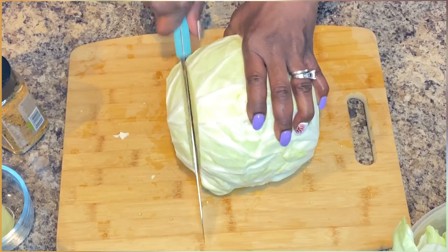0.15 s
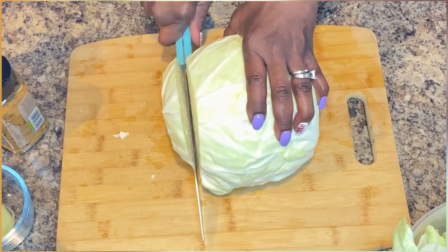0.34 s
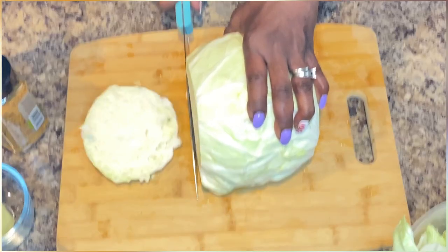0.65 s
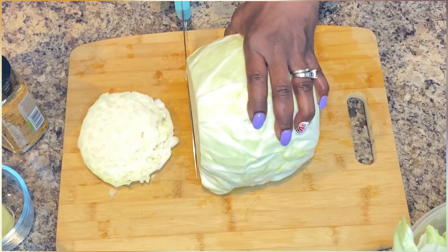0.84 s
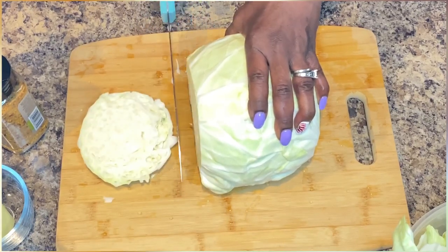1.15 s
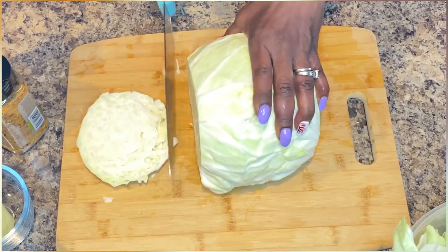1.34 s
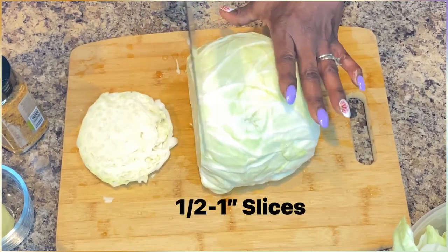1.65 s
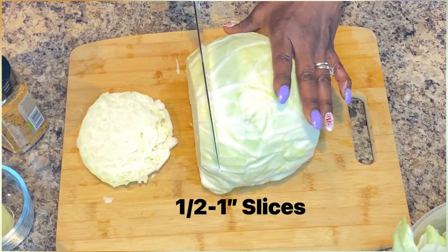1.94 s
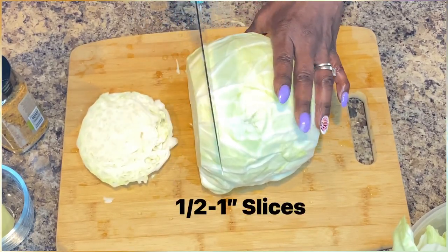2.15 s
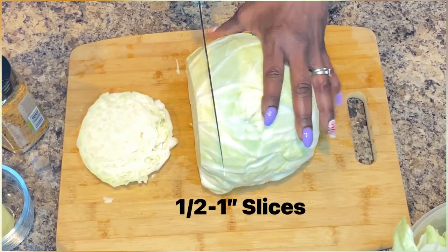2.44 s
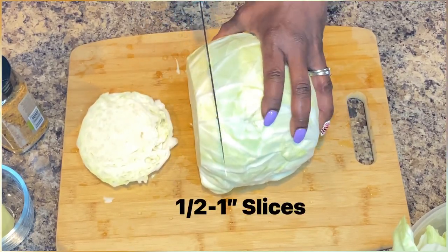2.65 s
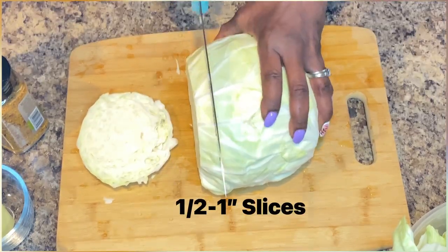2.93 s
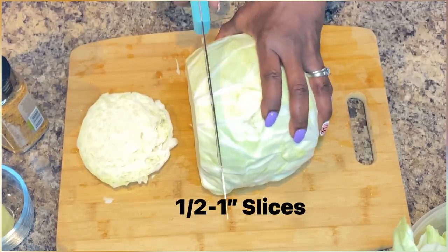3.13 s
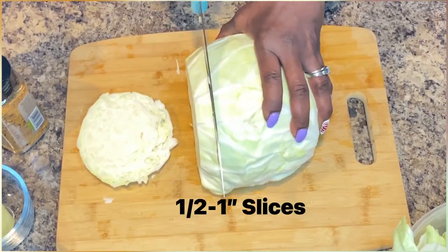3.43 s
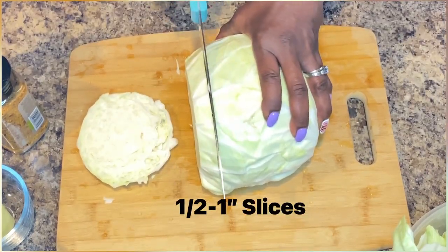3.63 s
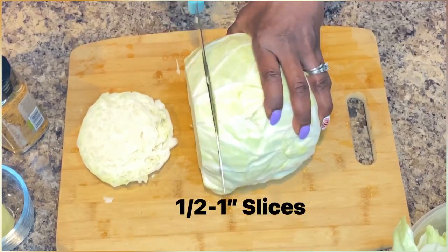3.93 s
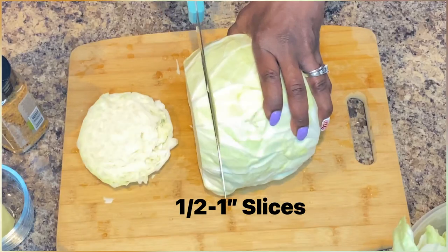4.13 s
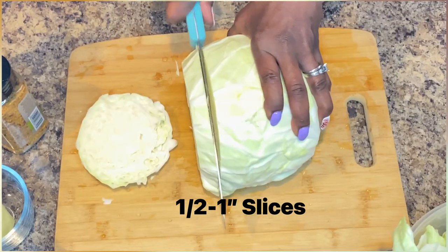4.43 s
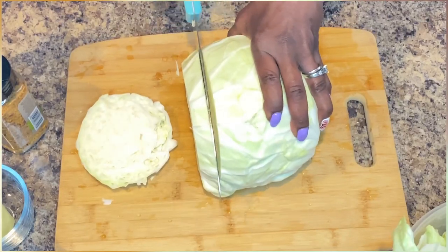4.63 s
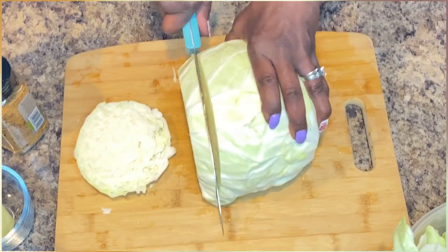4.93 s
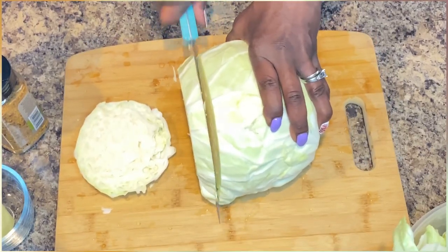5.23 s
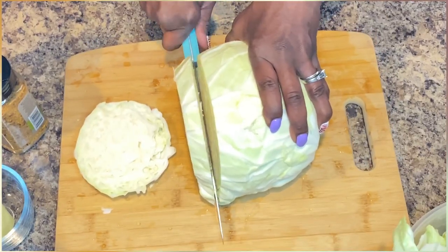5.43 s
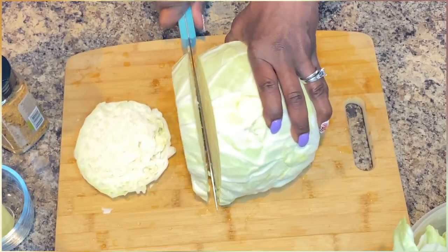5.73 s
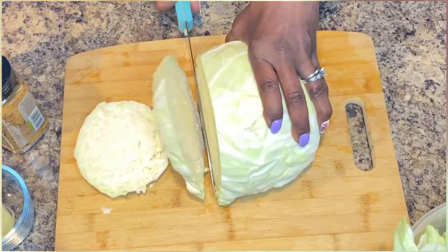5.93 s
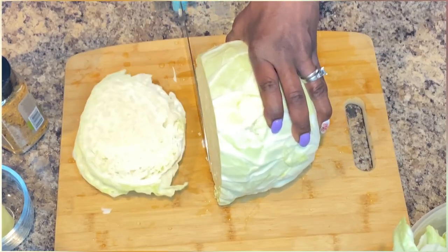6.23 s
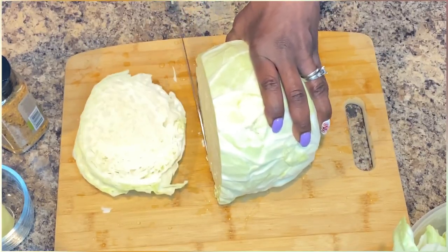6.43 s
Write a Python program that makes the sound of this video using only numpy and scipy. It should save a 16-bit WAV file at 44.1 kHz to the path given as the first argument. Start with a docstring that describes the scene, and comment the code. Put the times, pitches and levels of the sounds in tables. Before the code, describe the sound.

A knife crunches through a raw cabbage on a wooden board, with sharp wooden knocks and two wet slices flopping down in a quiet kitchen.

```python
"""A kitchen knife saws through a raw cabbage on a wooden board, close to the microphones, in a small kitchen.
Each push is a crunch: thousands of random clicks stand for bursting leaf cells, with a few ribs snapping.
Knocks on the board are short fading tones; drags of the blade are hiss with drifting tones.
Two slices topple over: noise that swells and dies makes the wet slap, deep fading tones the soft thud.
Behind it all, filtered noise makes a quiet room rumble with a low hum that swells once."""
import sys
import numpy as np
from scipy import signal
from scipy.fft import rfft, irfft
from scipy.io import wavfile
from scipy.ndimage import uniform_filter1d

SR = 44100
rng = np.random.default_rng(int(sys.argv[2]) if len(sys.argv) > 2 else 0)


def put_to_file(sound):
    """Save the sound as 16-bit audio at rate SR, in the file named by the first command-line argument."""
    columns = np.atleast_2d(sound).T  # one column per channel
    safe = np.clip(columns, -1, 1)
    whole_steps = np.round(safe * 32767)
    wavfile.write(sys.argv[1], SR, whole_steps.astype(np.int16))


N = 289737
TIME = np.arange(N) / SR

# sound colour of the room rumble: (frequency [Hz], level [dB per Hz])
AIR_COLOUR = [(22, -26), (40, -7), (65, 1), (110, -6), (170, -15), (280, -19), (500, -27), (850, -30),
              (1300, -36), (2200, -51.5), (4000, -62), (10000, -60.5), (16000, -67)]
AIR_DB, HUM_DB = -51, -61.5  # the hum level holds outside its swell
# the low hum swells once: (time of the top [s], half width [s], rise [dB])
HUM_SWELL = (5.68, 0.49, 12.2)

# how long the kitchen rings on: (frequency [Hz], time to fall by 60 dB [s])
ROOM_DECAY = [(150, 0.6), (600, 0.25), (1500, 0.17), (12000, 0.14)]
FIRST_ECHO_S = 0.0035  # the diffuse tail starts to build after this time
# near echoes off the kitchen surfaces: (delay [s], gain [factor])
NEAR_ECHOES = [(.0043, 0.25), (.0092, 0.16)]
# phase by which the left microphone leads the right: (frequency [Hz], phase [radians])
MIC_PHASE = [(300, 0), (700, -.33), (1100, 0), (1650, 0), (2500, 1.15), (3500, .3), (4200, .65),
             (4700, 1.7), (5250, 6.2), (7000, 7.4), (10000, 8.3), (12500, 9.42)]
EDGE_HZ = 15800  # almost nothing is heard above this

# cabbage toppling, rocking and bumping on the board: (time [s], peak level [dB], pitch [factor])
FLOPS = [(.627, -28.5, 1.34), (.639, -25.5, 0.9), (.684, -37, 1.18), (0.709, -39, 0.91),
         (6.135, -29, 0.974), (6.188, -37, 0.98), (6.207, -40.5, 0.96)]
# tones of cabbage and board thudding together, before the pitch factor:
# (frequency [Hz], relative level [dB], time to fall by 60 dB [s])
THUD_TONES = [(52.7, -2, 0.25), (99, 1, 0.12), (145.5, -5.5, 0.13), (213, 0, 0.094), (296, -6, 0.05)]

# the wet face of a slice slapping down:
# (time of full contact [s], peak level [dB], time to close [s], time to die away [s])
SLAPS = [(0.6226, -22.5, 0.0099, 0.032), (6.127, -26, 0.048, 0.031)]
# sound colour of a slap: (frequency [Hz], level [dB per Hz])
SLAP_COLOUR = [(200, -11), (900, -3.5), (2500, -3), (4600, -11.5), (5600, -9.5), (15000, -32.5)]

# the flat of the blade gliding up the cut face: (start [s], length [s], level [dB])
GLIDE = (1.48, 0.2, -80)
# resonances during the glide: (frequency [Hz], width [Hz], relative level [dB])
GLIDE_TONES = [(2020, 350, -1), (4100, 650, 0)]

# the blade dragged over the board: (start [s], length [s], level at the start [dB])
DRAGS = [(0.13, 0.1, -53.5), (0.331, 0.28, -51.5), (0.627, 0.26, -55), (0.985, 0.094, -49),
         (1.212, 0.075, -60), (5.237, 0.048, -46), (5.32, 0.064, -51), (5.518, 0.14, -52.5),
         (5.695, 0.097, -58.5), (5.81, 0.31, -58.5), (6.148, 0.16, -57.5), (6.338, 0.33, -63)]
# resonances of blade and board under a drag: (frequency [Hz], width [Hz], relative level [dB])
DRAG_TONES = [(919, 220, -1), (2134, 480, 0), (3020, 220, -8)]
# sound colour of the hiss of the dragged blade: (frequency [Hz], level [dB per Hz])
DRAG_COLOUR = [(300, -14), (1400, -10), (4000, -16), (6300, -25), (15000, -31.5)]
# each drag leans in, eases off and lifts
DRAG_ATTACK_S, DRAG_RELEASE_S, DRAG_SAG_DB_PER_S = 0.015, 0.049, 9

# knocks on the board, by the blade or by the rocking cabbage: (time [s], peak level of the wood [dB],
# hardness of the contact [Hz], pitch of the spot struck [factor], ringing relative to the wood [dB])
KNOCKS = [(0.1092, -13.5, 2390, 1.09, -26.5), (0.1103, -18, 2150, 1.8, -38), (0.1124, -26.5, 900, .62, -45),
          (.3475, -33, 1790, 0.8, -37), (0.9807, -18.5, 2470, 1.05, -26), (0.9872, -14.5, 1350, 1.04, -32),
          (.989, -28, 706, 0.513, -45), (1.0491, -21, 1290, 1, -31), (1.067, -24.5, 1300, 0.95, -47.5),
          (1.0908, -27, 1650, 0.94, -43), (1.184, -10.5, 1750, 1.06, -48), (1.272, -32, 1310, 0.96, -36),
          (2.0392, -48.5, 2200, 1.24, -30), (2.4479, -32, 1840, 1.27, -36.5), (2.731, -23, 1660, 1.34, -38),
          (3.7035, -33.5, 755, 0.86, -50), (3.709, -34, 603, 0.42, -49), (5.2268, -4, 2630, 0.99, -12.5),
          (5.2283, -15.5, 970, 0.85, -45), (5.394, -40, 1210, 1.13, -41), (5.449, -34, 2630, 1.64, -8),
          (6.4751, -25, 1470, 0.99, -25)]
# tones of the board in contact with what strikes it, before the pitch factor:
# (frequency [Hz], relative level [dB], time to fall by 60 dB [s])
BOARD_TONES = [(584, -14.5, .01), (871, 9, 0.012), (959, 7, .005), (1512, 2, 0.0095), (2297, 6, 0.0094),
               (3142, 8, 0.027)]
# tones ringing on after a knock: (frequency [Hz], relative level [dB], time to fall by 60 dB [s])
RINGING_TONES = [(458, -20, .2), (880, -4, .16), (980, -8, .14), (1088, -13, .18), (1254, -12, .15),
                 (1522, -13, .12), (1833, -9, .12), (2044, -6, .12), (2144, -1, .13), (2240, 1, .15),
                 (2366, 0, .14), (3028, -10, .14), (4080, -17, .14), (4480, -2, .02)]
CONTACT_ORDER = 8  # steepness with which a soft contact mutes the high tones

# single leaves and ribs snapping: (time [s], peak level [dB], time to die away [s])
SNAPS = [(0.982, -22, 0.041), (1.272, -38.5, 0.025), (1.645, -48, 0.0089), (2.0392, -48.5, 0.0034),
         (2.4486, -32.5, 0.049), (2.633, -54.5, 0.012), (2.73, -25, 0.014), (2.7335, -28, 0.047),
         (2.768, -30.5, 0.014), (2.811, -31.5, 0.064), (2.967, -35.5, 0.025), (3.213, -47.5, .01),
         (3.436, -40, 0.024), (3.474, -30, 0.016), (3.988, -42, 0.0096), (4.005, -35.5, 0.0042),
         (4.033, -44, 0.019), (4.375, -40.5, 0.016), (4.418, -30.5, 0.0083), (4.4794, -31, 0.011),
         (4.715, -32.5, 0.024), (4.9441, -22.5, 0.02), (5.033, -34.5, 0.041), (5.4826, -31, 0.012),
         (5.53, -42, 0.021)]

# pushes of the blade through leaves: (start [s], length [s], crunch level [dB], place of the crest [0-1],
# hollow body of the head relative to the crunch [dB])
PUSHES = [(0, 0.2, -56.5, 0, 0), (0.081, 0.1, -47, 0.29, 2), (0.209, 0.25, -48.5, 0.46, -4.5),
          (0.983, 0.14, -63, 0.86, 14.5), (1.353, 0.1, -67.5, 0.6, 2), (2.46, 0.32, -70, 0, 0),
          (2.722, 0.048, -48, 0.8, -0.5), (2.831, 0.064, -44, 0.07, -1.5), (2.961, 0.086, -46, 0.38, -1.5),
          (3.056, 0.076, -48, 0.67, -3.5), (3.217, 0.048, -51.5, 0.67, -2.5), (3.266, 0.16, -64, 0.2, -3),
          (3.449, 0.081, -50.5, 0.71, -3), (3.647, 0.085, -42, 0.81, -3.5), (3.8, 0.095, -53, 0.57, -5),
          (3.902, 0.12, -56.5, 0.2, -14), (4.035, 0.062, -50, 0.9, -6.5), (4.224, 0.11, -42.5, 0.36, -3.5),
          (4.397, 0.23, -59.5, 0.26, -4), (4.646, 0.084, -46.5, 0.66, -3.5),
          (4.775, 0.26, -58, 0.11, -11.5), (4.9, 0.034, -37.5, 0.74, -5), (4.916, 0.053, -35, 0.68, -4),
          (4.972, 0.017, -48.5, 0.4, 5), (5.022, 0.11, -49, 0.02, -5), (5.191, 0.042, -38, 0.7, -3),
          (5.413, 0.12, -51.5, 0.3, -7), (5.513, 0.089, -47, 0.28, -9), (6.09, 0.12, -50, 0.12, -9.5)]
# sound colour of bursting cells: (frequency [Hz], level [dB per Hz])
CELL_COLOUR = [(500, -29.5), (1100, -6.5), (1600, -2.5), (2500, -2), (3200, -2.5), (4500, -7), (5600, -9.5),
               (6900, -16), (8200, -8.5), (10000, -12.5), (12300, -10.5), (13300, -26.5), (15800, -43)]
# sound colour of the hollow head of cabbage: (frequency [Hz], level [dB per Hz])
HEAD_COLOUR = [(120, -39), (280, -0.5), (520, -1), (730, 2), (1000, 2.5), (1300, 2), (2000, -17.5),
               (4000, -66.5)]
# sound colour of the board shaking under a push: (frequency [Hz], level [dB per Hz])
PRESS_COLOUR = [(25, -18), (58, -1), (130, -9), (260, -14.5), (400, -11), (800, -33.5)]
SLACK_DB = 8  # a push is this much weaker at its ends than at its crest
BITE_S, RELEASE_S = 0.0062, 0.008  # the edge bites in, and stops
SETTLE_DB, SETTLE_S = -19.5, 0.13  # parted leaves go on crackling after each push


def gain_of(db):
    """Turns decibels into a loudness factor (amplitude)."""
    return 10 ** (np.asarray(db) / 20)


def evened(x):
    """Scales a sound to an average strength (rms) of 1."""
    return x / np.sqrt(np.mean(x ** 2) + 1e-20)


def peaked(x):
    """Scales a sound so that its highest peak is 1."""
    return x / (abs(x).max() + 1e-20)


def read(points, hz):
    """Reads between the points of a table, with frequency on a log scale."""
    f, value = np.transpose(points)
    return np.interp(np.log(hz + 1), np.log(f + 1), value)


def add(mix, s, sound):
    """Lays a sound into the mix at a time in seconds."""
    part = mix[max(round(s * SR), 0):][:len(sound)]
    part += sound[:len(part)]


def colour(x, spectrum, size=4096):
    """Gives a sound a colour with a filter that never acts ahead of time, so clicks stay sharp."""
    hz = abs(np.fft.fftfreq(size, 1 / SR))
    log_gain = np.log(gain_of(read(spectrum, hz)))
    minimum_phase = np.exp(np.conj(signal.hilbert(log_gain)))
    taps = np.fft.ifft(minimum_phase).real
    return signal.oaconvolve(x, taps[:size // 2])[:len(x)]


def wander(per_s):
    """A smooth random curve around zero, with an average strength (rms) of 1."""
    slow_only = 1 / (1 + (np.fft.rfftfreq(N, 1 / SR) / per_s) ** 4)
    return evened(irfft(rfft(rng.standard_normal(N)) * slow_only, N))


def swell(top_s, width_s, rise_db):
    """Gain of one slow, bell-shaped swell."""
    return gain_of(rise_db * np.exp(-((TIME - top_s) / width_s) ** 2))


def stroke(start, length, attack_s, release_s):
    """Attack, hold and release of one movement of the knife."""
    t = TIME - start
    attack = np.clip(t / attack_s, 0, 1)
    return attack * np.exp(-np.clip((t - length) / release_s, 0, 50))


def bursts(per_s, spread_db, count=N):
    """Random clicks of both signs; a positive spread makes a few much larger, a negative one a few smaller."""
    size = gain_of(spread_db * np.minimum(rng.exponential(1, count), 3.5))
    present = rng.random(count) < per_s / SR
    return size * rng.choice([-1, 1], count) * present


def ring(modes, pitch=1, lag=0, bend_hz=1200):
    """Fading tones after one blow, neighbours swinging opposite ways; with a lag, low bending waves arrive later.
    The pitch factor of the spot struck acts fully below bend_hz, and less and less above."""
    out, top = np.zeros(SR // 2), modes[-1][0]
    for k, (hz, db, t60) in enumerate(modes):
        delay = abs(lag) * (np.sqrt(top / hz) - 1)
        t = np.maximum(np.arange(SR // 2) / SR - delay, 0)
        shifted = hz * pitch ** min(1, (bend_hz / hz) ** 2)
        out += (-1) ** k * gain_of(db - 60 * t / t60) * np.sin(2 * np.pi * shifted * t)
    return out


def rubbed(tones):
    """Fine slips sound resonances that drift, swell and fade as the point of contact travels along the blade."""
    out, travel = np.zeros(N), 1 + .035 * wander(6)
    for hz, width, db in tones:
        # slow noise carried up to the drifting pitch makes a band of noise around it
        low_pass = signal.butter(2, width / 2, fs=SR)
        band, quadrature = signal.lfilter(*low_pass, rng.standard_normal((2, N)))
        turn = 2 * np.pi * np.cumsum(hz * travel) / SR
        coupling = gain_of(2.5 * wander(9))
        out += gain_of(db) * coupling * evened(band * np.cos(turn) + quadrature * np.sin(turn))
    return evened(out)


def air(hum_hz=97, hum_width_hz=5):
    """Room rumble with a narrow, wavering hum, both made from filtered noise."""
    hz = np.fft.rfftfreq(N, 1 / SR)
    rumble = irfft(rfft(rng.standard_normal(N)) * gain_of(read(AIR_COLOUR, hz)), N)
    hum = irfft(rfft(rng.standard_normal(N)) / (1 + ((hz - hum_hz) / hum_width_hz) ** 4), N)
    return gain_of(AIR_DB) * evened(rumble) + gain_of(HUM_DB) * swell(*HUM_SWELL) * evened(hum)


def tail(x):
    """Diffuse reverberation: scattered clicks as echoes, each band dying at its own speed."""
    build_up = np.clip(np.arange(SR // 2) / SR / FIRST_ECHO_S - 1, 0, 1)
    taps = bursts(per_s=3000, spread_db=-1.5, count=SR // 2) * build_up
    hz, t, z = signal.stft(taps, SR, nperseg=256)
    decay = gain_of(-60 * t / read(ROOM_DECAY, hz)[:, None])
    response = signal.istft(z * decay, SR, nperseg=256)[1]
    return signal.fftconvolve(x, response / np.linalg.norm(response))[:N]


def kitchen(x, wet_db, wide_db, mono_hz=220):
    """Direct sound, near echoes, and a tail that differs at each microphone above the bass."""
    near = x.copy()
    for delay, gain in NEAR_ECHOES:
        add(near, delay, gain * x)
    side = signal.lfilter(*signal.butter(2, mono_hz, "high", fs=SR), tail(x))
    left_right = np.array([[1], [-1]])
    return near + gain_of(wet_db) * tail(x) + gain_of(wide_db) * side * left_right


def flops():
    """Soft heavy blows of cabbage on the board: deep tones that fade."""
    out = np.zeros(N)
    for s, db, pitch in FLOPS:
        add(out, s, gain_of(db) * peaked(ring(THUD_TONES, pitch)))
    return out


def slaps():
    """Leaf edges touch down ever more thickly until the whole face lies flat; then the noise dies away."""
    out = np.zeros(N)
    for s, db, close_s, t60 in SLAPS:
        contact = gain_of(-60 * np.maximum((s - TIME) / close_s, (TIME - s) / t60))
        out += gain_of(db) * peaked(colour(contact * rng.choice([-1, 1], N), SLAP_COLOUR))
    return out


def glide():
    """The lifted blade whispers against the cut face, sounding drifting resonances."""
    start, length, db = GLIDE
    return gain_of(db) * stroke(start, length, DRAG_ATTACK_S, DRAG_RELEASE_S) * rubbed(GLIDE_TONES)


def drags(hiss_db=-2):
    """The edge slides over wet wood: drifting resonances of blade and board over a fine hiss."""
    pressure = np.zeros(N)
    for start, length, db in DRAGS:
        easing = gain_of(db - DRAG_SAG_DB_PER_S * np.maximum(TIME - start, 0))
        pressure = np.maximum(pressure, easing * stroke(start, length, DRAG_ATTACK_S, DRAG_RELEASE_S))
    hiss = evened(colour(bursts(per_s=3500, spread_db=4), DRAG_COLOUR))
    return pressure * evened(rubbed(DRAG_TONES) + gain_of(hiss_db) * hiss)


def knocks(click_db=-17, click_hard_hz=3000, click_s=.012, lag=0.00051, bass_hz=380):
    """Blade or cabbage hits the board; a soft contact mutes the high tones, a hard one adds a crisp click."""
    out, ringing, t = np.zeros(N), peaked(ring(RINGING_TONES)), np.arange(SR // 2) / SR
    no_bass = signal.butter(2, bass_hz, "high", fs=SR)  # the small board radiates little bass
    for s, db, hard_hz, pitch, ring_db in KNOCKS:
        contact = signal.butter(CONTACT_ORDER, min(hard_hz, SR / 3), fs=SR, output="sos")
        board = signal.lfilter(*no_bass, ring(BOARD_TONES, pitch, lag))
        wood = peaked(signal.sosfilt(contact, board))
        fading_noise = rng.standard_normal(len(t)) * gain_of(-60 * t / click_s)
        click = peaked(colour(fading_noise, CELL_COLOUR))
        crisp = gain_of(click_db) * (hard_hz / click_hard_hz) ** 2  # click_db holds at click_hard_hz
        add(out, s, gain_of(db) * (wood + crisp * click + gain_of(ring_db) * ringing))
    return out


def snaps(head_db=-2, crack=1.4):
    """A leaf or rib gives way: one crack and a quick, dying run of further ones, heard in the head as well."""
    out, t = np.zeros(N), np.arange(SR // 8) / SR
    for s, db, t60 in SNAPS:
        run = evened(bursts(per_s=6000, spread_db=1.5, count=len(t))) * gain_of(-60 * t / t60)
        run[0] += crack
        snap = colour(run, CELL_COLOUR) + gain_of(head_db) * colour(run, HEAD_COLOUR)
        add(out, s, gain_of(db) * peaked(snap))
    return out


def effort(start, length, db, crest):
    """A push bites in, builds to its crest, slackens and stops; the parted leaves settle after it."""
    top = start + length * np.clip(crest, .02, .98)
    arch = gain_of(np.interp(TIME, [start, top, start + length], [-SLACK_DB, 0, -SLACK_DB]))
    settling = gain_of(SETTLE_DB) * stroke(start, length, length, SETTLE_S)
    return gain_of(db) * np.maximum(arch * stroke(start, length, BITE_S, RELEASE_S), settling)


def cell_bursts(per_s, spread_db, cycles=2.4, count=24):
    """Cells pop with a brief ring at one of many pitches, so the crackle changes colour from grain to grain."""
    out, t = np.zeros(N), np.arange(SR // 100) / SR
    for hz in np.linspace(800, 13000, count):
        pop = np.exp(-t * hz / cycles) * np.cos(2 * np.pi * hz * t)
        out += signal.oaconvolve(bursts(per_s / count, spread_db), pop / np.linalg.norm(pop))[:N]
    return evened(out)


def patchy(x, depth_db):
    """The colour shifts from layer to layer of leaf, in random patches of some 400 Hz by 35 ms."""
    z = signal.stft(x, nperseg=512)[2]
    across_hz = uniform_filter1d(rng.standard_normal(z.shape), size=5, axis=0)
    patches = evened(uniform_filter1d(across_hz, size=6, axis=1))
    return signal.istft(z * gain_of(depth_db * patches), nperseg=512)[1][:N]


def crunch(press_db=-1, fibres_db=-20, pops_db=1):
    """Cells burst at the edge in a dense crackle, which sounds the hollow layers of the head and shakes the board."""
    density = evened(uniform_filter1d(rng.standard_normal(N), size=130))
    clumps = gain_of(2.5 * np.minimum(density, 1.5))
    crackle = evened(bursts(per_s=2600, spread_db=4.5) * clumps)
    pops = cell_bursts(per_s=3200, spread_db=5.2)
    edge, body = np.zeros((2, N))
    for start, length, db, crest, body_db in PUSHES:
        push = effort(start, length, db, crest)
        edge = np.maximum(edge, push)
        body = np.maximum(body, gain_of(body_db) * push)
    bursting = colour(crackle + gain_of(pops_db) * pops, CELL_COLOUR)
    cells = edge * evened(patchy(bursting, depth_db=1.7))
    head = body * evened(patchy(colour(crackle, HEAD_COLOUR), depth_db=2.0))
    press = gain_of(press_db) * body * evened(colour(crackle, PRESS_COLOUR))
    # single fibres keep ticking when the push slackens: the power below 1 evens out their level
    ticks = cell_bursts(per_s=170, spread_db=5.5, cycles=1.2)
    fibres = gain_of(fibres_db) * edge ** 0.74 * evened(colour(ticks, CELL_COLOUR))
    return cells + head + press + fibres


def scene():
    """Room air, soft thuds, knocks and leaf sounds together in the kitchen."""
    thuds = kitchen(flops(), wet_db=-11.5, wide_db=-19)
    board = kitchen(knocks(), wet_db=-9.5, wide_db=-18.5)
    leaves = kitchen(slaps() + glide() + drags() + snaps() + crunch(), wet_db=-7.5, wide_db=-12.5)
    return air() + thuds + board + leaves


def record(dry):
    """Two closely spaced microphones differ in phase; then the highest treble is cut off."""
    lead = read(MIC_PHASE, np.fft.rfftfreq(N, 1 / SR))
    left_right = np.array([[1], [-1]])  # each side takes half of the lead
    pair = irfft(rfft(dry) * np.exp(.5j * lead * left_right), N)
    low_pass = signal.firwin(511, EDGE_HZ, window=("kaiser", 9), fs=SR)
    return signal.oaconvolve(pair, low_pass[None], "same")


dry = scene()
out = record(dry)
put_to_file(out)
```